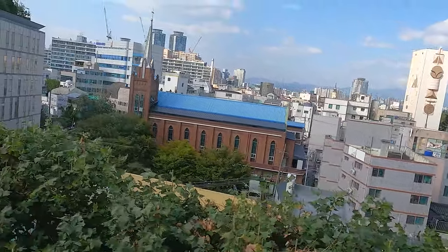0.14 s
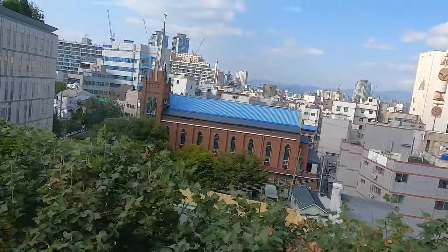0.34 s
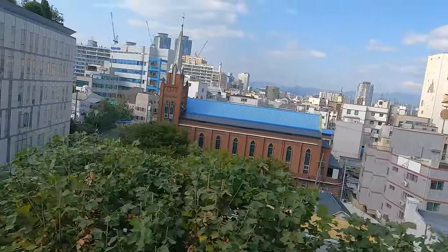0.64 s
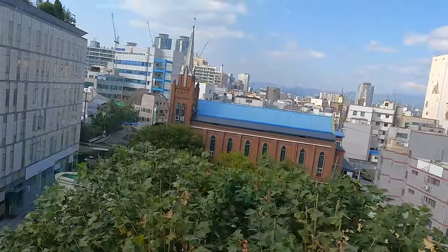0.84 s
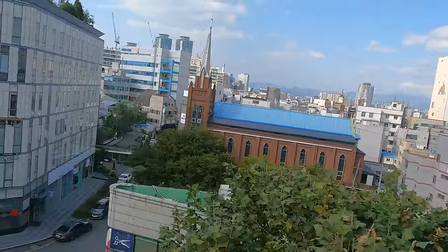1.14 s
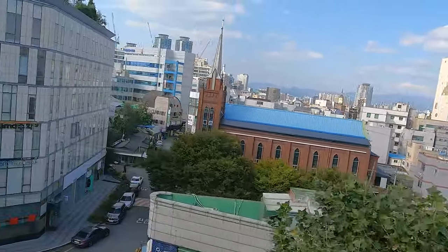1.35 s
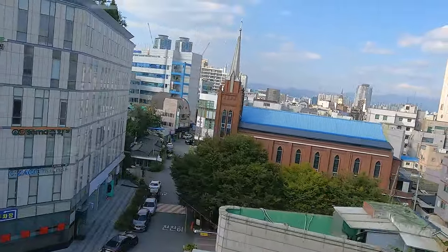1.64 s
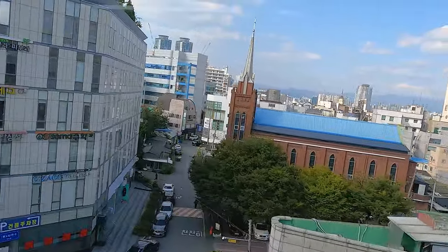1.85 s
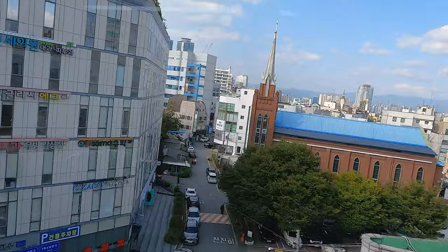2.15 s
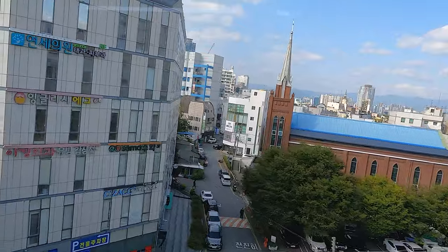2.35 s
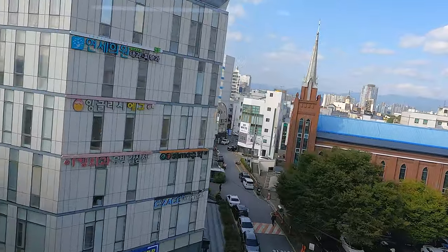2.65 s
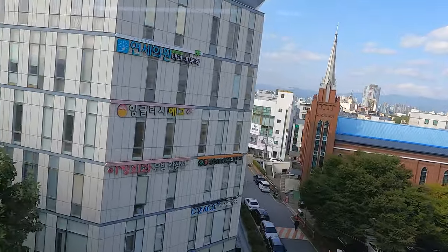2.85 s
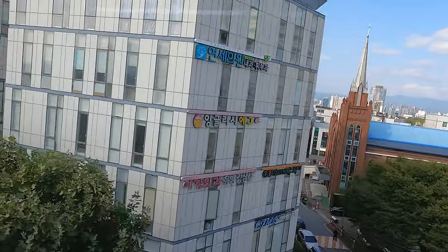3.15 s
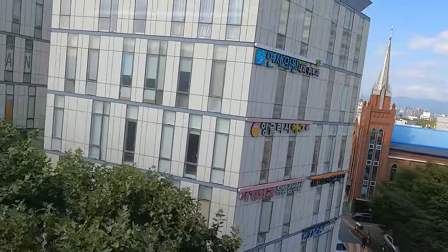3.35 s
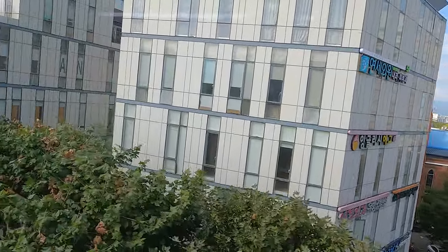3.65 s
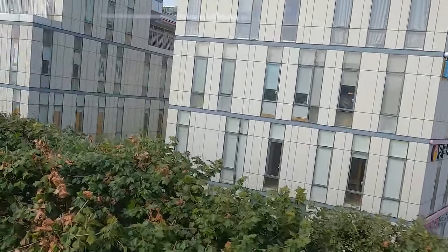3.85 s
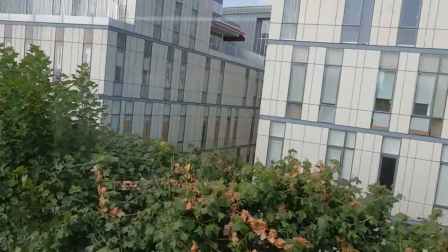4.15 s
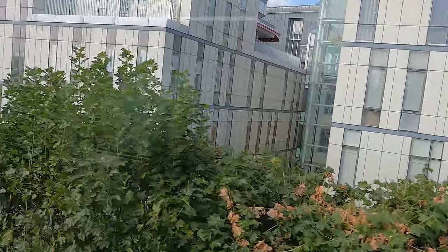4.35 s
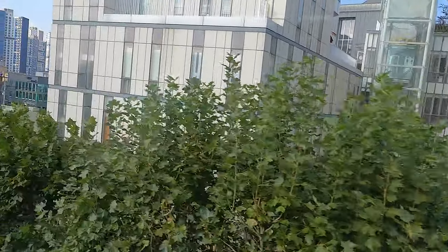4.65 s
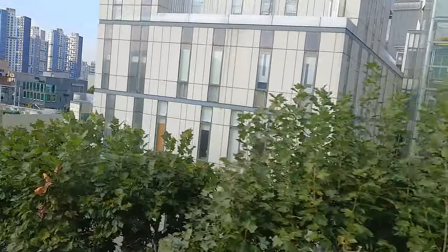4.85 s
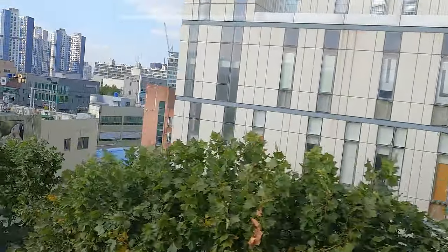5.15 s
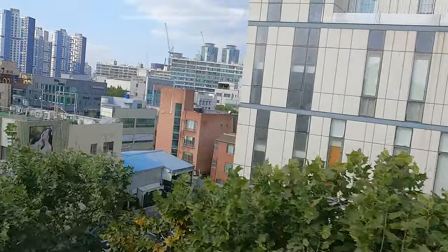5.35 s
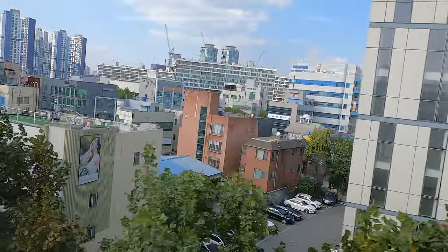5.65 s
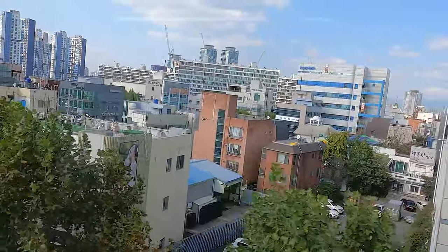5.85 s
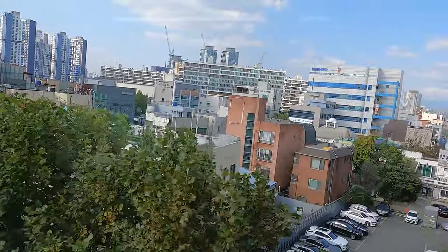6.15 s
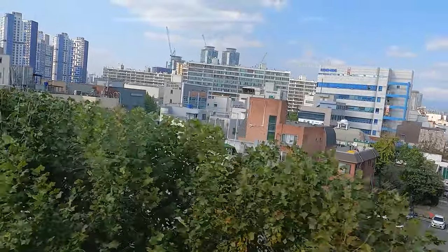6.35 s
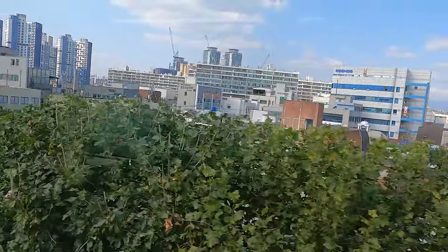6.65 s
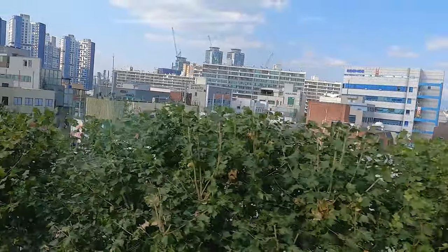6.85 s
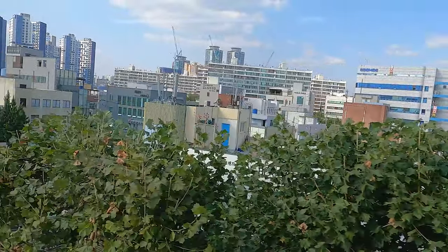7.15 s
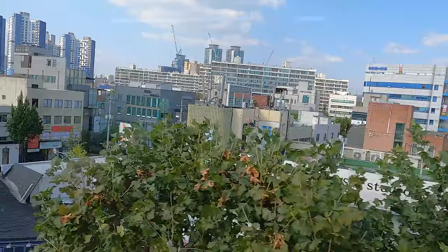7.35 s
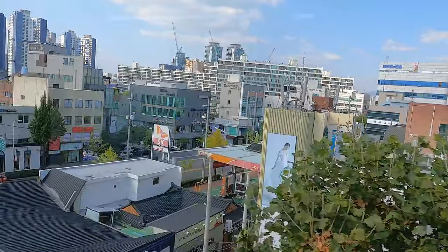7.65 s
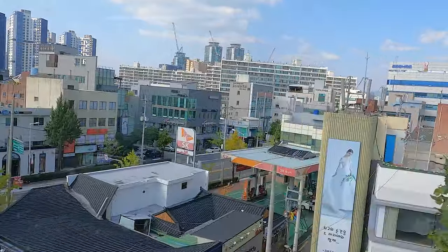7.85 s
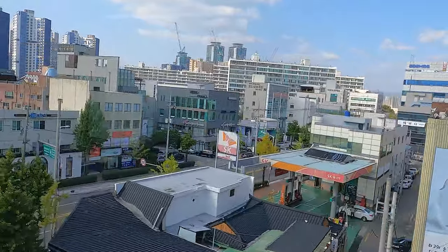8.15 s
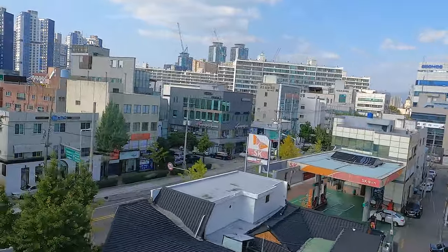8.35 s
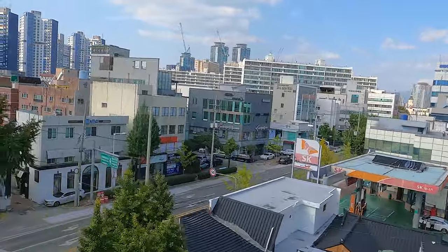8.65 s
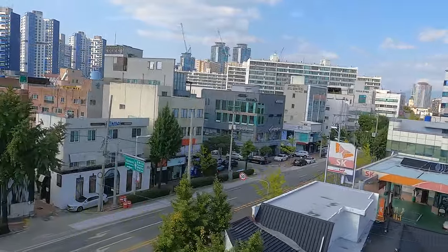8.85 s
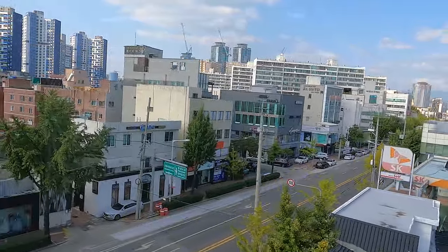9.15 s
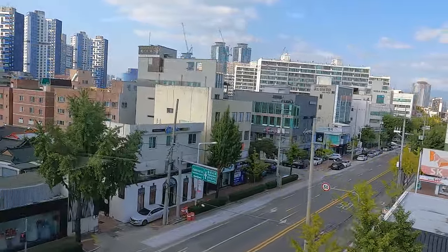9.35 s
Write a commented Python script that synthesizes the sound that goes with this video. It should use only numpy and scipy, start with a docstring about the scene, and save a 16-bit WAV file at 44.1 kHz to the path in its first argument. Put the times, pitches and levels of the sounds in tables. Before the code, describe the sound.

Deep cabin rumble of an elevated rubber-tyred train at constant speed, faint wavering hum and ventilation hiss, with irregular rattling knocks from three seconds on.

```python
"""Inside a monorail car at cruise, microphone at a window seat; rubber tyres on a concrete beam.
From the start: a low rumble and drone of coloured noise and ringing panels, a wavering hum from under
the floor, tyre roar, ventilation hiss and a thin whistle. After a second single resonances swell as
gliding tones and panels clack or rub in noise bursts. From three seconds the trim ticks and the frame
knocks dully as the car sways: short bursts of force that ring damped modes. All run on to the end."""
import sys
import numpy as np
from scipy import signal
from scipy.fft import rfft, irfft
from scipy.io import wavfile
from scipy.ndimage import uniform_filter1d, minimum_filter1d

SR = 44100
rng = np.random.default_rng(int(sys.argv[2]) if len(sys.argv) > 2 else 0)


def persist_wave(psi):
    """Save psi, clipped to +-1, as 16-bit WAV."""
    counts = np.round(np.clip(psi, -1, 1) * 32767).astype(np.int16)
    wavfile.write(sys.argv[1], SR, np.atleast_2d(counts).T)


N = 419391
TIME = np.arange(N) / SR
BIN_HZ = np.maximum(np.arange(N // 2 + 1) * SR / N, 1)

# Noise colours are scaled to rms 1, so their levels are relative: [f/Hz, level/dB per Hz]
# car body shaking on its springs
SHAKE_COLOUR = [(5, -5), (17, -8.5), (28, -1.5), (36, 2.5), (48, -3), (60, -2), (80, -16), (160, -59.5)]
# air booming in the cabin
BOOM_COLOUR = [(35, -27.5), (60, 2), (76, 0), (92, 1), (107, -4), (132, -1), (165, -8), (210, -17.5),
               (400, -30), (1000, -63)]
# broad drone of the walls
WALL_COLOUR = [(120, -12), (190, 3.5), (260, -2), (350, -6.5), (450, -15.5), (590, -21), (720, -27.5),
               (1400, -53.5)]
# force that drives the wall panels
PANEL_DRIVE_COLOUR = [(100, -12), (220, 4), (600, -3.5), (1200, -23)]
# tyre roar as heard through the floor
ROAR_COLOUR = [(200, -4.5), (600, 2), (860, -2.5), (970, 0), (1250, -0.5), (1600, -1.5), (2000, -9),
               (2600, -18.5), (4000, -26.5), (9000, -51.5)]
# ventilation air
HISS_COLOUR = [(1200, -8), (2900, 1), (4000, -1), (5500, -0.5), (6200, 2), (6900, -1.5), (7700, -7),
               (8100, -11.5), (9500, -13.5), (11000, -19.5), (12200, -21.5), (15000, -45)]
# clacking and rubbing panels
RUB_COLOUR = [(600, -9), (1400, 5), (2700, 9), (5000, 2.5), (7000, -10), (12000, -30)]
# panel behind the trim; crack of the trim's snap
CLACK_COLOUR = [(600, -7.5), (1400, 5.5), (2400, -2.5), (4500, -7.5), (8000, -22)]
CRACK_COLOUR = [(2000, -8), (3500, -1), (5200, 5), (7500, -2), (9000, -8), (12500, -17), (15000, -32)]
# juddering frame; buzzing fitting; broad thud under a knock
JUDDER_COLOUR = [(200, -5.5), (450, 9), (620, -3.5), (1100, -13)]
BUZZ_COLOUR = [(400, -3.5), (850, 2.5), (1100, -5), (1400, -13), (2500, -26)]
THUD_COLOUR = [(120, -4), (250, 1.5), (450, -3), (650, -15), (1200, -25.5)]

# ringing modes of the wall panels: [f/Hz, width/Hz, relative level/dB]
PANEL_MODES = [(214.4, 7.3, -1), (259.6, 16.6, -2.5), (313.3, 17.2, -3), (352, 21.6, -7), (424, 11, -10),
               (488.7, 16, -9.5), (596, 2.7, -15)]
# ringing modes of the trim: [f/Hz, width/Hz, relative level/dB]
TRIM_MODES = [(4650, 860, -5), (5100, 500, -2.5), (5750, 780, -5), (6800, 290, -5), (7050, 440, -12),
              (9200, 870, -19.5), (11900, 800, -17)]
# hollow modes of the frame: [f/Hz, width/Hz, relative level/dB]
FRAME_MODES = [(523.4, 80, -3), (580.6, 49, 0)]
# deep thump of the frame: [f/Hz, relative level/dB]
THUMP_MODES = [(132, 0.5), (272, -4)]

# low shaking as the beam gets rougher and smoother: [t/s, level/dB before SHAKE_GAIN_DB]
SHAKE_LEVEL = [(0.0, -27.5), (2.19, -21), (2.5, -27), (2.96, -28), (3.07, -24.5), (3.6, -21), (3.89, -26),
               (4.08, -21.5), (4.7, -21), (5.5, -22.5), (5.62, -29), (5.96, -20), (6.1, -29.5),
               (6.4, -22.5), (7.39, -22.5), (7.8, -23.5), (7.97, -26), (8.6, -22), (9.51, -28.5)]
# hum of the drive: [t/s, level/dB before its random waver]
HUM_LEVEL = [(0, -37.5), (1.6, -40.5), (2.4, -38), (3.6, -45.5), (4.9, -41), (6.2, -41.5), (7, -43.5),
             (7.8, -39.5), (9.5, -43)]
# tyre roar: [t/s, level/dB before ROAR_GAIN_DB and flutter]
ROAR_LEVEL = [(0.1, -41.5), (1.11, -40.5), (5.41, -41), (5.43, -42), (6.81, -38.5), (6.96, -40),
              (8.52, -39), (8.8, -40.5), (9.4, -39)]
# air hiss: [t/s, level/dB before the roar's share and flutter]
HISS_LEVEL = [(0, -53), (.7, -51.5), (2.2, -52.5), (3, -52), (3.8, -53), (4.5, -51.5), (5.6, -52.5),
              (6.4, -51.5), (7.6, -52.5), (8.5, -50), (8.9, -50), (9.4, -50)]

# sway sets one resonance of the cabin or its springs booming: [centre t/s, length/s, f/Hz, level/dB]
SWELL_EVENTS = [(1.35, 0.33, 77, -18.5), (2.0, 0.27, 131, -19.5), (2.35, 0.44, 81, -21),
                (2.5, 0.72, 131, -23), (2.76, 0.88, 89, -19), (3.16, 0.61, 28, -19.5),
                (4.362, 0.34, 28, -21), (4.95, 0.64, 42, -18), (5.396, 0.47, 27, -16.5),
                (8.72, .55, 28, -17), (5.103, 0.35, 134, -21.5), (5.62, 0.29, 90, -18),
                (6.666, 0.43, 116, -20), (6.735, 0.47, 64, -16), (6.93, 0.3, 118, -19),
                (7.212, 0.36, 89, -16.5), (8.187, 0.23, 98, -15), (8.295, 0.38, 127, -24),
                (8.5, 0.44, 55, -19), (9.177, 0.41, 61, -17)]
# short noisy clacks and rubs of the panels, some abrupt, some slow: [t/s, level/dB, rise/s, decay/s]
RUB_EVENTS = [(1.268, -49, .011, .025), (3.329, -46, .001, 0.027), (4.133, -43, .002, 0.02),
              (4.502, -45, .005, 0.022), (4.933, -50, .011, .025), (5.114, -54, .005, .02),
              (6.645, -50, .03, 0.11), (8.5, -58, .011, .13)]
# sharp ticks of the trim, levels before the mix: [t/s, snap level/dB, ring level/dB, ring f/Hz]
TICK_EVENTS = [(3.161, -38.5, -37, 5000), (3.4753, -48, -47, 5400), (3.4785, -47, -44, 4880),
               (4.2365, -42.5, -52, 4850), (4.3932, -42.5, -36, 4300), (4.619, -56, -44, 4280),
               (4.644, -49, -41, 4300), (4.956, -49, -46, 4250), (5.239, -49, -48, 4700),
               (5.315, -51, -43, 4800), (6.046, -47.5, -52, 5900), (6.804, -48, -54, 6400),
               (6.978, -45, -43.5, 6950), (7.2355, -40, -39, 6840), (8.139, -50, -54, 6900),
               (8.576, -49.5, -52, 4300)]
# a trim piece gives a little, snaps home and rebounds: [t/s from the snap, relative level/dB]
SNAP_STEPS = [(-.0016, -10), (0, 1.5), (.0024, -7.5)]
# dull knocks of the frame, levels before the mix:
# [t/s, knock level/dB, thump level/dB, fitting's ring level/dB, fitting's f/Hz before detune and sag]
KNOCK_EVENTS = [(3.289, -26.5, -14.5, -43, 980), (3.329, -30, -22, -29.5, 994),
                (3.425, -28.5, -34, -46, 980), (3.476, -41, -17, -46, 980), (4.039, -20, -18, -38, 1030),
                (4.268, -25, -24.5, -40, 1000), (4.556, -39, -31, -29, 1024), (4.575, -40, -32, -37, 840),
                (4.635, -36, -23, -39, 984), (4.917, -25, -32, -38, 920), (5.030, -31, -27, -33, 900),
                (5.099, -30, -28, -48, 980), (5.301, -24, -14.5, -29.5, 900), (5.336, -32, -41, -46, 820),
                (5.762, -40, -33, -34, 1040), (5.891, -22.5, -27, -44, 1000), (6.382, -21, -17, -34, 980),
                (6.681, -33, -33, -32, 977), (6.815, -33, -29, -34, 1007), (7.038, -26, -19.5, -34, 1015),
                (7.43, -29.5, -37, -44, 990), (8.288, -24, -20.5, -35, 985), (8.361, -35, -21, -46, 970),
                (8.505, -26.5, -19, -46, 980), (8.568, -19, -24, -30.5, 960), (8.605, -31, -33, -48, 980),
                (8.713, -25.5, -24.5, -49, 970)]

SHAKE_GAIN_DB, ROAR_GAIN_DB = 3.5, 2.5
BOOM_DB, DRONE_DB = -18, -25  # cabin air; wall drone at the start
SURGE_DB, SURGE_HZ = 0.82, 5  # the boom surges with the bumps of the beam
DRONE_WAVER_DB, DRONE_WAVER_HZ, DRONE_FADE_DB_PER_S = 0.5, 3.9, 0.25
HUM_HZ, HUM_WANDER = 351.1, 0.00596  # mean pitch, and the share by which it wanders
HISS_PER_ROAR = 0.39  # dB of extra hiss for each dB of tyre roar
SWELL_WANDER = 0.02  # share by which a booming pitch wanders
SNAP_LOW_HZ, SNAP_HIGH_HZ = 4180, 11000  # the ringing snap lies mostly between these
PAIR_SPLIT = 0.03  # a trim piece rings in two modes, this share above and below its pitch
JUDDER_LEAD_S = 0.013  # the judder starts to build this long before the knock
TICK_TOP_HZ, TOP_HZ = 12300, 15000  # treble limits of the ticks and of the microphone chain


def undb(db):
    """Decibels to gain."""
    return 10 ** (np.asarray(db) / 20)


def unit(x):
    """Scale to rms 1."""
    return x / np.std(x)


def curve(table):
    """Rows of (t/s, value) as a control over time."""
    return np.interp(TIME, *np.transpose(table))


def walk(rate):
    """Smooth random drift with spread 1, heading for a new value this many times a second."""
    k = int(SR / rate)
    steps = np.repeat(rng.standard_normal(N // k + 1), k)
    return unit(uniform_filter1d(steps, k)[:N])


def noise(spectrum):
    """Noise of rms 1 with a colour of (f/Hz, level/dB per Hz) points."""
    hz, db = np.transpose(spectrum)
    gain = undb(np.interp(np.log(BIN_HZ), np.log(hz), db, right=-120))
    return unit(irfft(rfft(rng.standard_normal(N)) * gain, N))


def chatter(grain_db):
    """Dense micro-impacts of unequal size between two surfaces."""
    return unit(rng.standard_normal(N) * undb(grain_db * rng.standard_normal(N)))


def ring(x, modes):
    """Drive damped resonances; broadband force of rms 1 rings a 0 dB mode at rms 1."""
    out = 0
    for hz, width, db in modes:
        b, a = signal.iirpeak(hz, hz / width, fs=SR)
        narrow_band_gain = np.sqrt(SR / (np.pi * width))
        out = out + undb(db) * narrow_band_gain * signal.lfilter(b, a, x)
    return out


def contact_shape(age, rise_s, decay_s):
    """A contact that builds up and dies away, with its peak at 1."""
    shape = (1 - np.exp(-age / rise_s)) * np.exp(-age / decay_s)
    return shape / shape.max()


def blows(times, levels_db, rise_s, decay_s):
    """Force envelope of a row of contacts."""
    out = np.zeros(N)
    age = TIME[:SR // 2]
    shape = contact_shape(age, rise_s, decay_s)
    for s, db in zip(times, levels_db):
        part = out[int(s * SR):][:len(age)]
        part += undb(db) * shape[:len(part)]
    return out


def struck(times, levels_db, pitches_hz, rise_s, decay_s, sag=0):
    """A mode rung by each contact, slightly detuned each time; its pitch falls by sag as it fades."""
    out = np.zeros(N)
    age = TIME[:SR // 4]
    shape = contact_shape(age, rise_s, decay_s)
    chance = rng.random((len(times), 2))
    pitches_hz = np.broadcast_to(pitches_hz, len(times))
    for s, db, hz, (turn, detune) in zip(times, levels_db, pitches_hz, chance):
        fall = sag * (np.exp(-age / decay_s) - 0.5)
        pitch = hz * (1 + 0.02 * (detune - 0.5) + fall)
        tone = np.sqrt(2) * np.sin(2 * np.pi * (np.cumsum(pitch) / SR + turn))
        part = out[int(s * SR):][:len(age)]
        part += (undb(db) * tone * shape)[:len(part)]
    return out


def body(shake_db):
    """The beam shakes the car on its springs; the cabin air booms and the wall panels drone and ring."""
    shake = noise(SHAKE_COLOUR) * undb(shake_db + SHAKE_GAIN_DB)
    boom = noise(BOOM_COLOUR) * undb(BOOM_DB + SURGE_DB * walk(SURGE_HZ))
    panels = unit(ring(noise(PANEL_DRIVE_COLOUR), PANEL_MODES))
    drone = noise(WALL_COLOUR) + undb(-3.5) * panels
    drone_db = DRONE_DB - DRONE_FADE_DB_PER_S * TIME + DRONE_WAVER_DB * walk(DRONE_WAVER_HZ)
    return shake + boom + drone * undb(drone_db)


def hum():
    """A faint hum of the drive comes through the floor, wavering in pitch and strength."""
    hz = HUM_HZ * (1 + HUM_WANDER * walk(9))
    tone = np.sqrt(2) * np.sin(2 * np.pi * np.cumsum(hz) / SR)
    return tone * undb(curve(HUM_LEVEL) + 2.5 * walk(7))


def tyres(roar_db):
    """Tread roar, muffled by the floor, fluttering with the texture of the concrete."""
    return noise(ROAR_COLOUR) * undb(roar_db + ROAR_GAIN_DB + 0.5 * walk(14))


def air(roar_db):
    """Air hiss that swells with the tyre roar, and a thin electrical whistle."""
    hiss_db = curve(HISS_LEVEL) + HISS_PER_ROAR * (roar_db - roar_db.mean())
    hiss = noise(HISS_COLOUR) * undb(hiss_db + 0.62 * walk(9.7))
    whistle_hz = 5280 + 3 * walk(4.7)
    whistle = np.sin(2 * np.pi * np.cumsum(whistle_hz) / SR) * undb(-75 + 2 * walk(3))
    return hiss + whistle


def swells():
    """Resonances that swell and fade in a smooth arch, their pitch wandering."""
    out = np.zeros(N)
    clock = np.cumsum(1 + SWELL_WANDER * walk(12)) / SR  # uneven time bends the pitch
    for (s, length, hz, db), turn in zip(SWELL_EVENTS, rng.random(len(SWELL_EVENTS))):
        near = np.abs(TIME - s) < length / 2
        arch = np.cos(np.pi * (TIME[near] - s) / length) ** 2
        tone = np.sqrt(2) * np.sin(2 * np.pi * (hz * clock[near] + turn))
        out[near] += undb(db) * arch * tone
    return out


def panel_clacks_and_rubs():
    """Panels clack or rub: bursts of uneven noise, with fast or slow onset."""
    unevenness = undb(3 * walk(400) - 0.7)
    bursts = sum(blows([s], [db], rise_s=rise, decay_s=decay) for s, db, rise, decay in RUB_EVENTS)
    return bursts * noise(RUB_COLOUR) * unevenness


def trim_ticks():
    """Plastic trim snaps and rings; the panel behind clacks, and the cabin scatters brief reflections."""
    s, db, ring_db, ring_hz = np.transpose(TICK_EVENTS)
    snap = sum(blows(s + lag, db + step_db, rise_s=0.0003, decay_s=0.0009) for lag, step_db in SNAP_STEPS)
    cabin = undb(-10.5) * blows(s, db, rise_s=0.003, decay_s=0.012)
    rings = ring((snap + cabin) * chatter(grain_db=2.5), TRIM_MODES)
    bright = signal.sosfilt(signal.butter(4, SNAP_LOW_HZ, "high", fs=SR, output="sos"), rings)
    bright = signal.sosfilt(signal.butter(1, SNAP_HIGH_HZ, fs=SR, output="sos"), bright)
    crack = snap * noise(CRACK_COLOUR)
    piece = sum(struck(s, ring_db, ring_hz * (1 + side * PAIR_SPLIT), rise_s=0.0004, decay_s=0.0036)
                for side in (-1, 1))
    clack = blows(s, db, rise_s=0.0013, decay_s=0.015) * noise(CLACK_COLOUR)
    ticks = bright + undb(-6) * crack + undb(-3.5) * piece + undb(1.5) * clack
    return signal.sosfilt(signal.butter(4, TICK_TOP_HZ, fs=SR, output="sos"), ticks)


def frame_knocks():
    """Frame parts take up their play: deep thump, hollow knock with uneven judder, loose fitting's ring."""
    s, db, thump_db, fitting_db, fitting_hz = np.transpose(KNOCK_EVENTS)
    thump = sum(struck(s, thump_db + mode_db, hz, rise_s=0.017, decay_s=0.014)
                for hz, mode_db in THUMP_MODES)
    thud = blows(s, thump_db, rise_s=0.0076, decay_s=0.022) * noise(THUD_COLOUR)
    knock = sum(struck(s, db + mode_db, hz, rise_s=0.01, decay_s=0.016)
                for hz, _, mode_db in FRAME_MODES)
    stutter = undb(3.5 * walk(110) - 1.4)  # uneven contact, shared by judder and buzz
    shudder = blows(s - JUDDER_LEAD_S, db, rise_s=0.02, decay_s=0.037)
    judder = ring(stutter * shudder * noise(JUDDER_COLOUR), FRAME_MODES)
    fitting = struck(s, fitting_db, fitting_hz, rise_s=0.0057, decay_s=0.017, sag=0.03)
    buzz = stutter * blows(s, fitting_db, rise_s=0.0044, decay_s=0.023) * noise(BUZZ_COLOUR)
    deep = thump + undb(-11.5) * thud
    hollow = undb(-8.5) * knock + undb(-28.5) * judder
    return deep + hollow + undb(-6.5) * (fitting + buzz)


def scene():
    """All that reaches a passenger at the window, on one channel."""
    roar_db = curve(ROAR_LEVEL)
    running = body(curve(SHAKE_LEVEL)) + hum() + tyres(roar_db) + air(roar_db)
    passing = swells() + panel_clacks_and_rubs() + trim_ticks() + frame_knocks()
    return (running + passing)[None]


def record(dry):
    """A limiter eases down the largest peaks, mostly swells of the rumble; the top is cut."""
    ceiling, size = 0.62, int(0.02 * SR)  # share of full scale; window in samples
    gain = np.minimum(1, ceiling / (np.abs(dry) + 1e-9))
    gain = uniform_filter1d(minimum_filter1d(gain, size), size)
    return signal.sosfilt(signal.ellip(8, 0.2, 70, TOP_HZ, fs=SR, output="sos"), dry * gain)


dry = scene()
out = record(dry)
persist_wave(out)
```